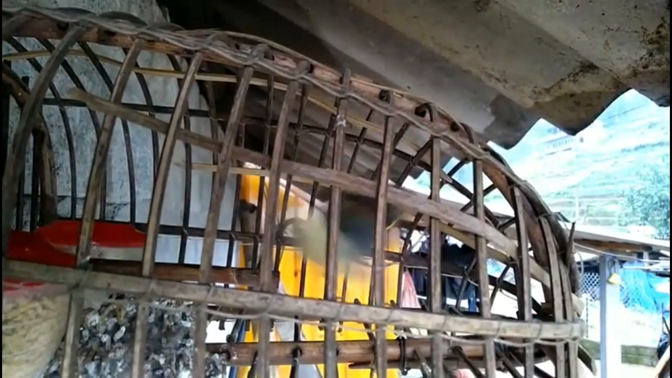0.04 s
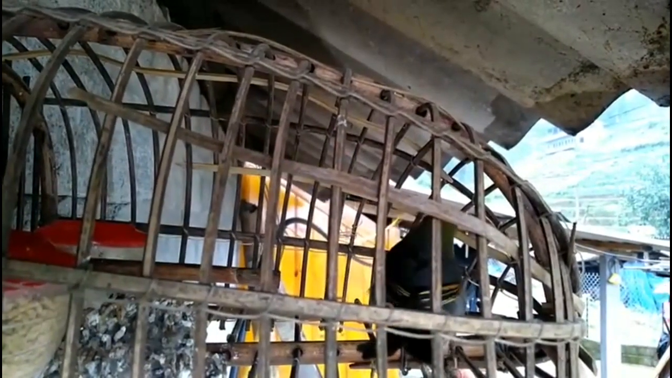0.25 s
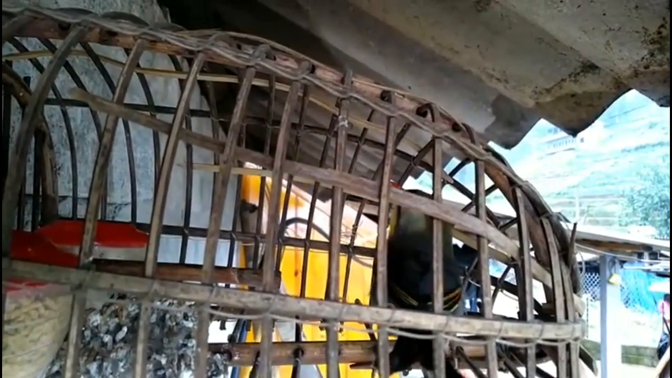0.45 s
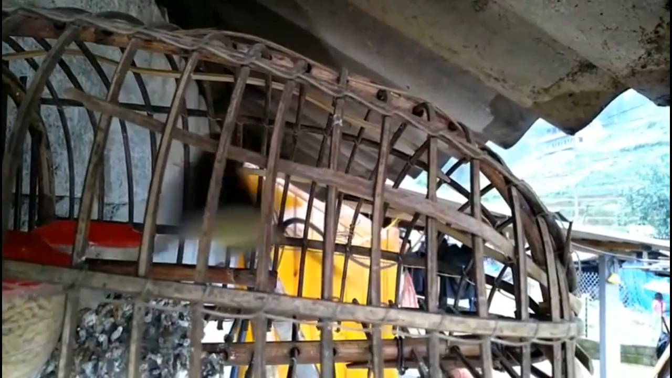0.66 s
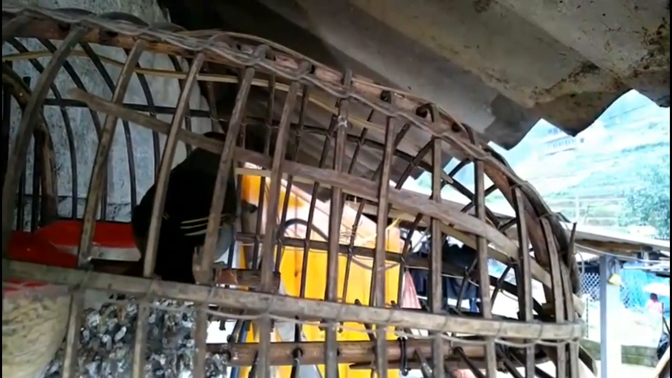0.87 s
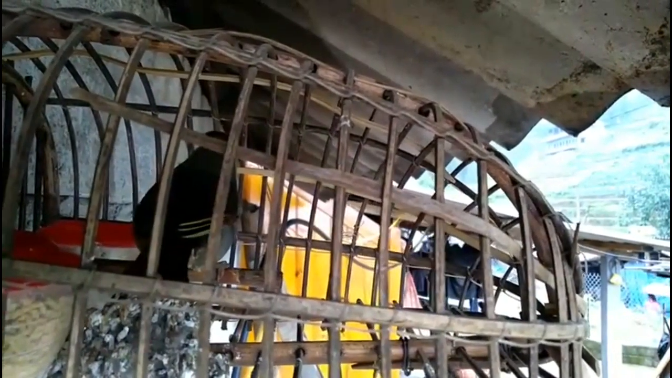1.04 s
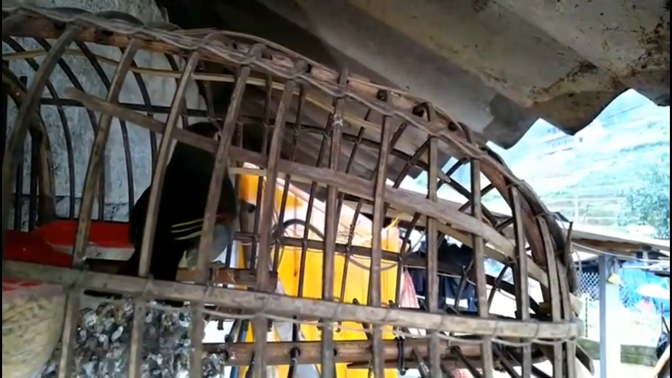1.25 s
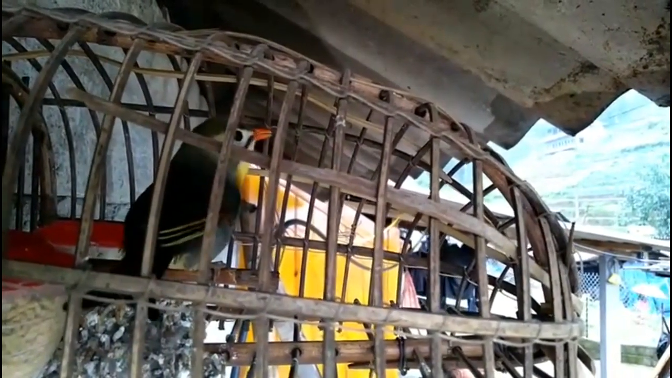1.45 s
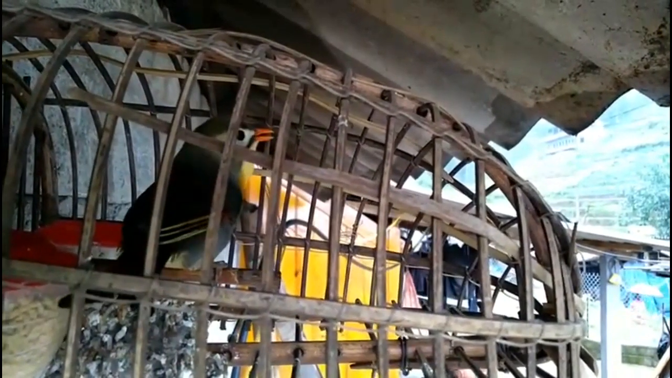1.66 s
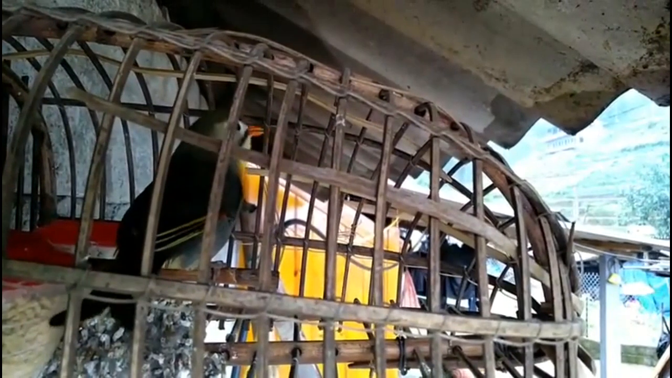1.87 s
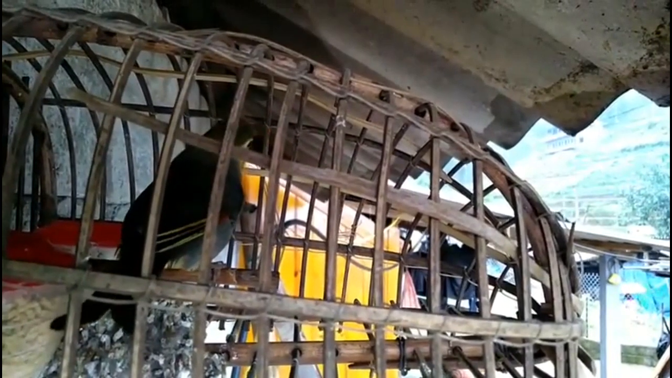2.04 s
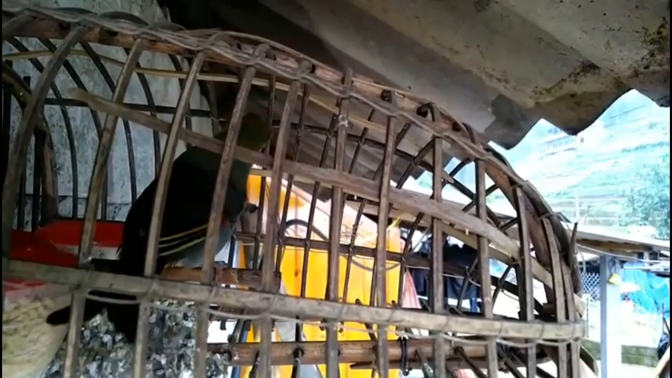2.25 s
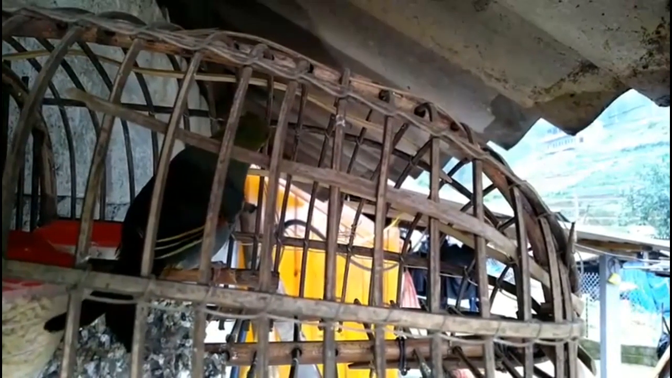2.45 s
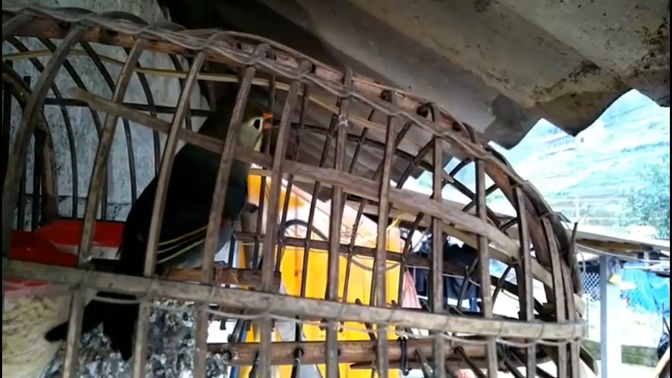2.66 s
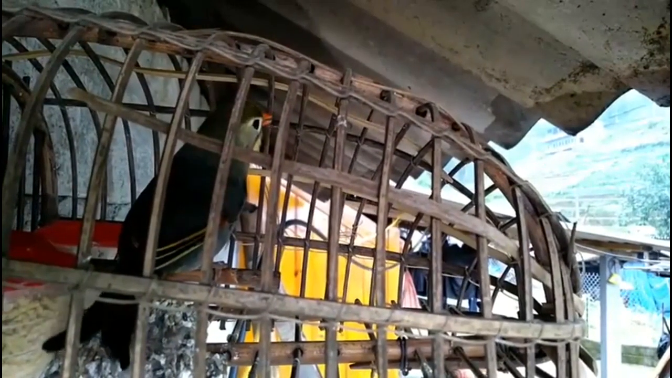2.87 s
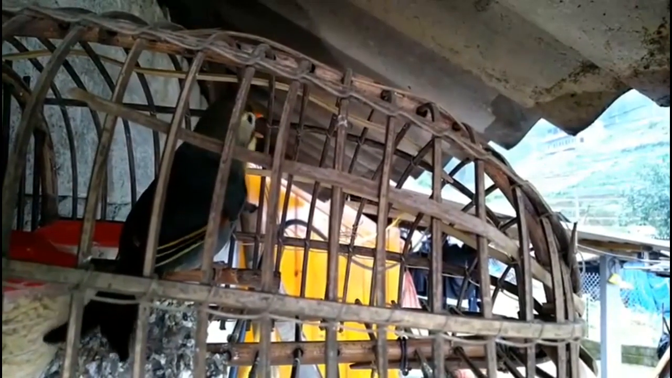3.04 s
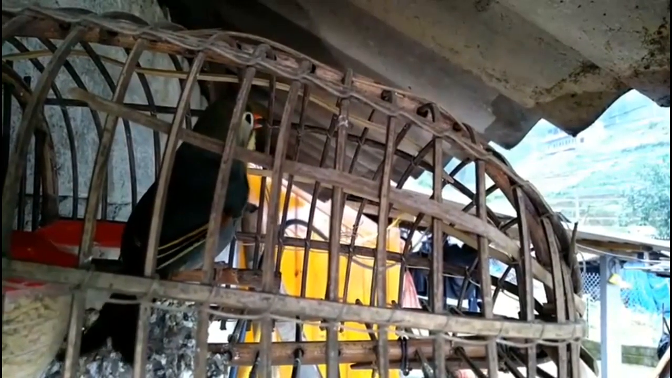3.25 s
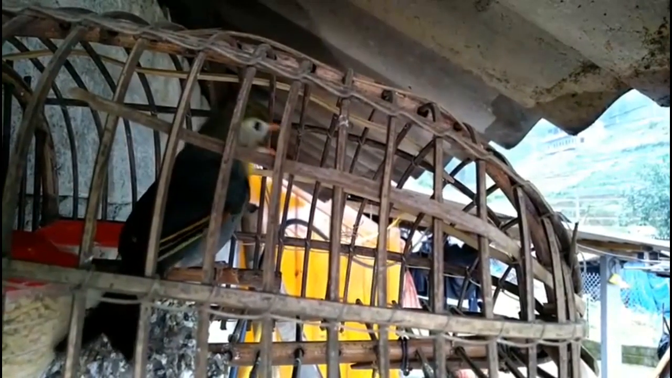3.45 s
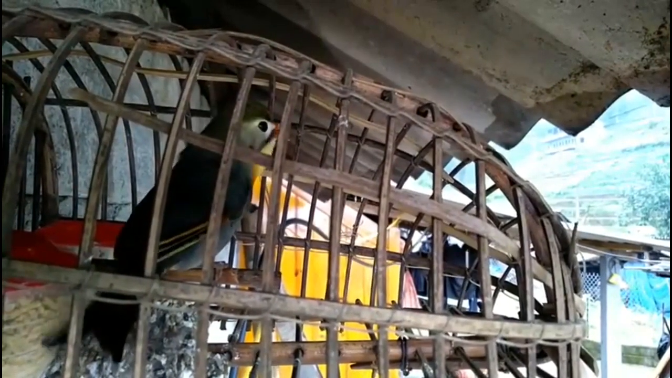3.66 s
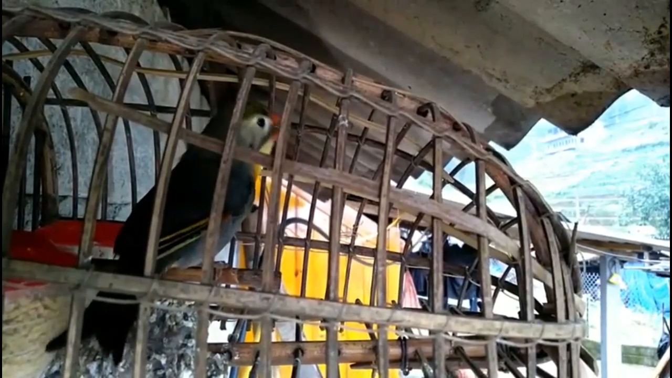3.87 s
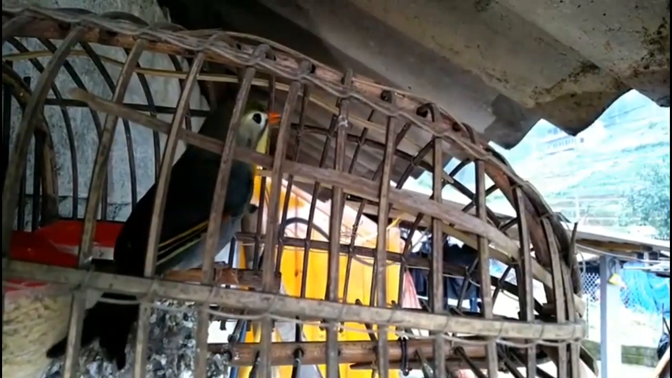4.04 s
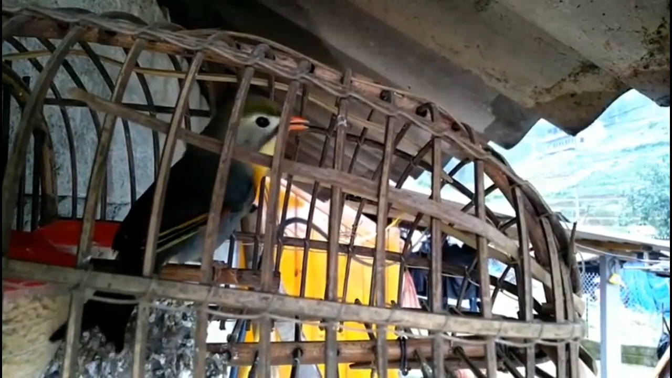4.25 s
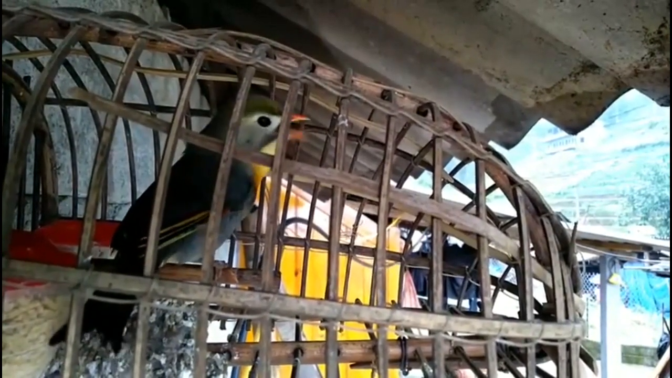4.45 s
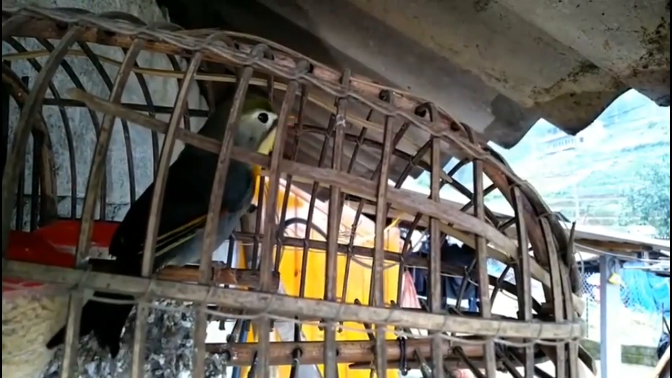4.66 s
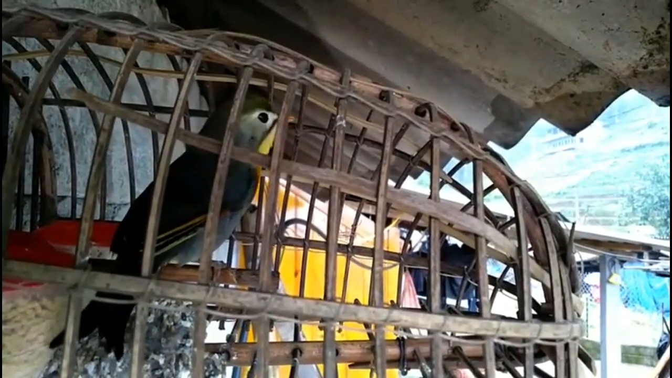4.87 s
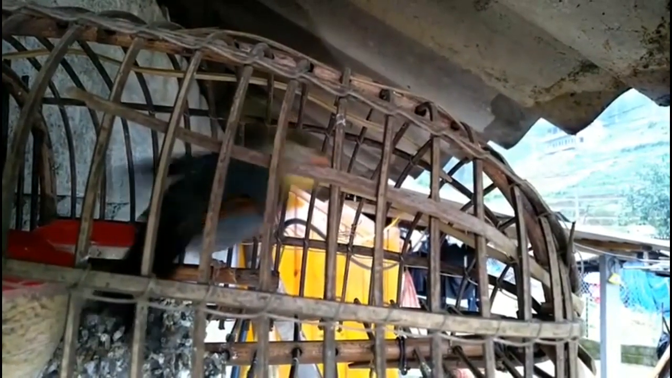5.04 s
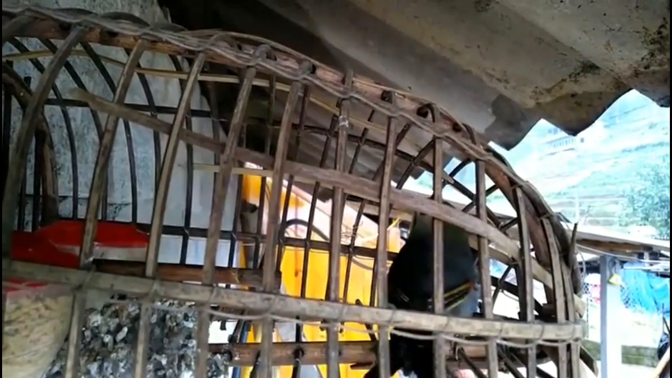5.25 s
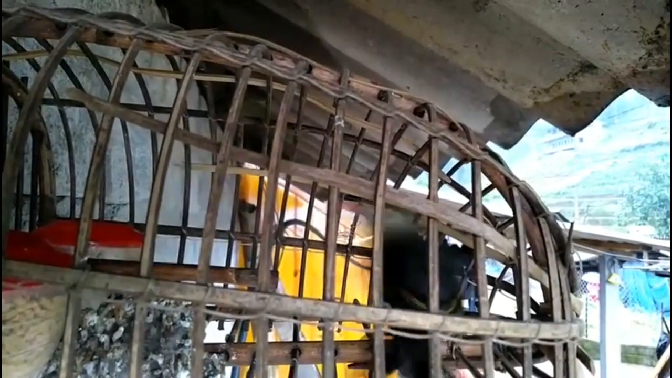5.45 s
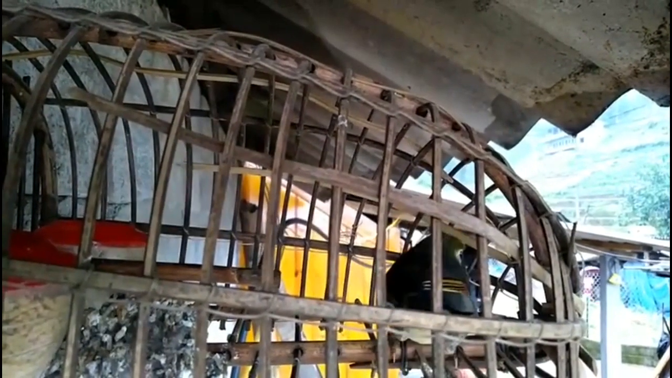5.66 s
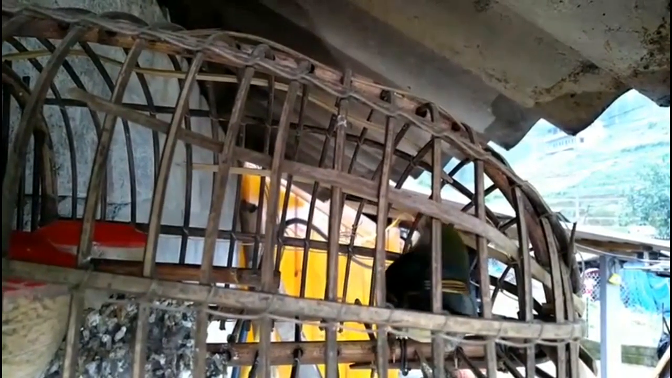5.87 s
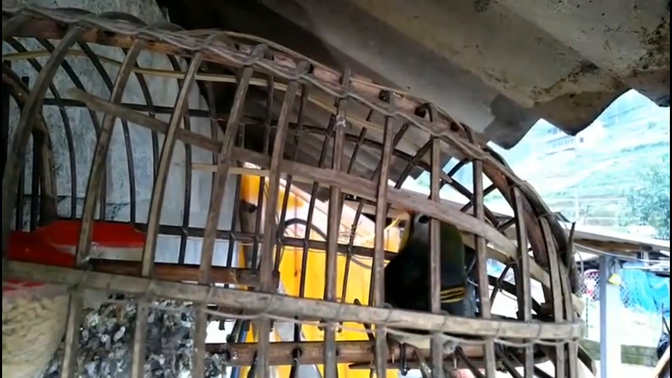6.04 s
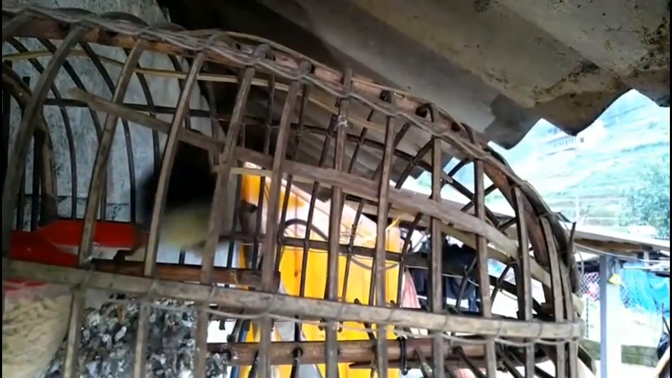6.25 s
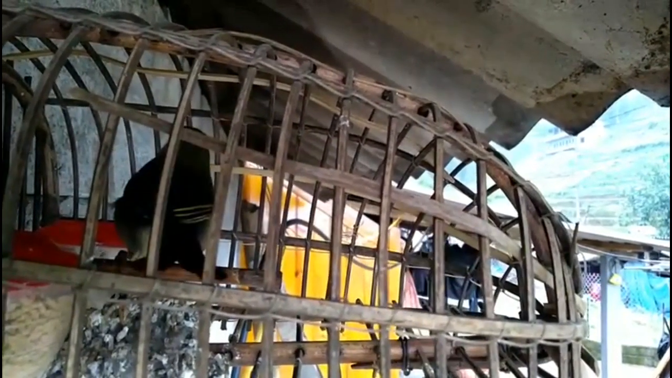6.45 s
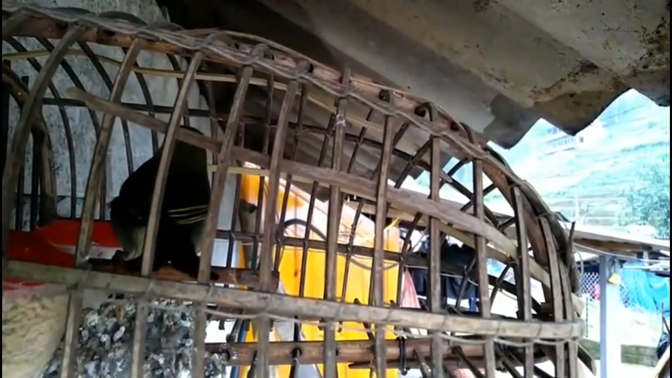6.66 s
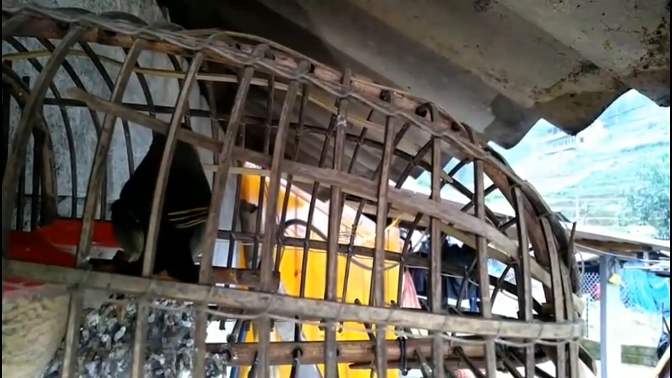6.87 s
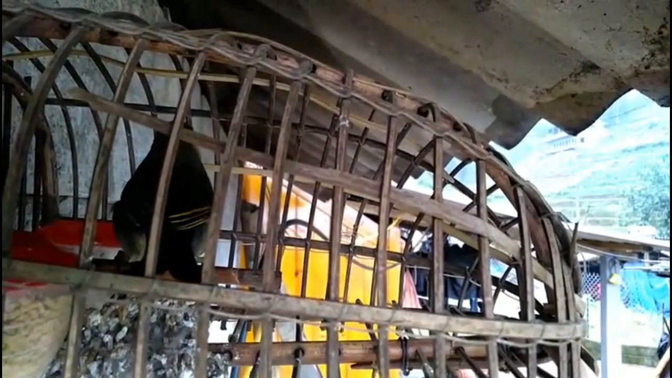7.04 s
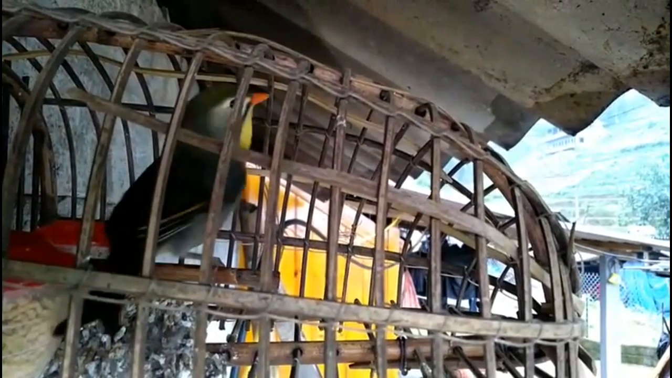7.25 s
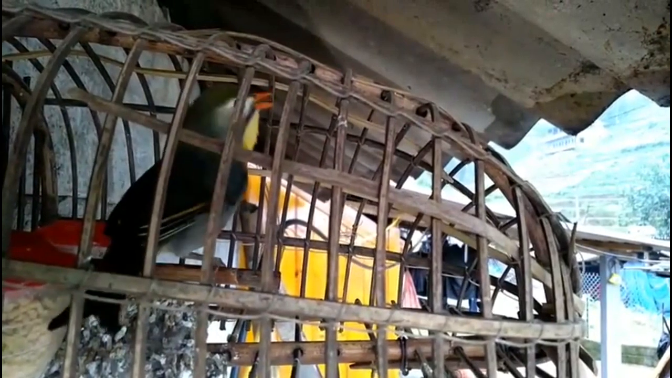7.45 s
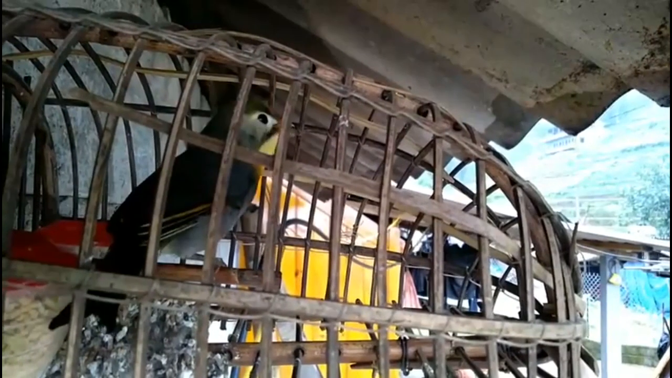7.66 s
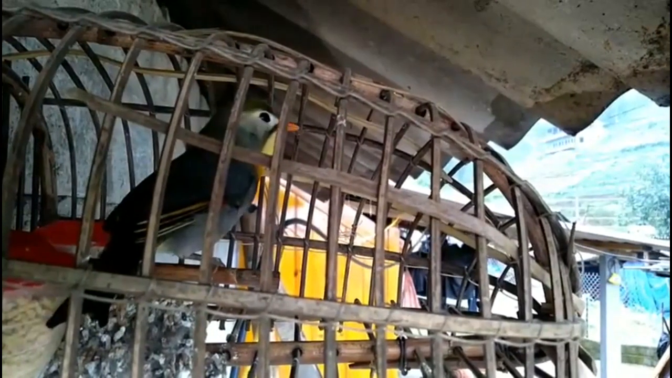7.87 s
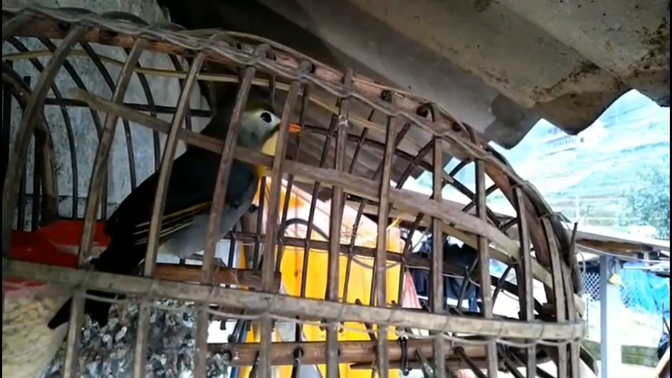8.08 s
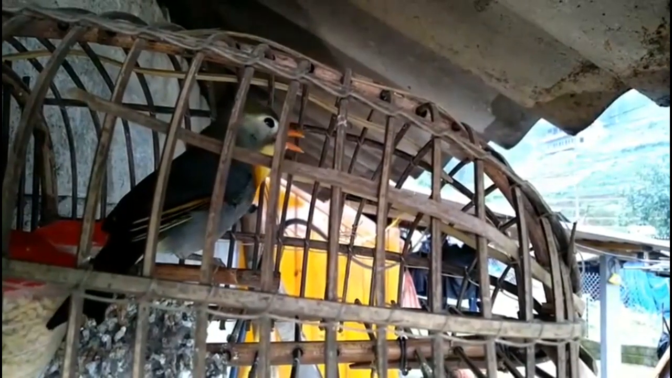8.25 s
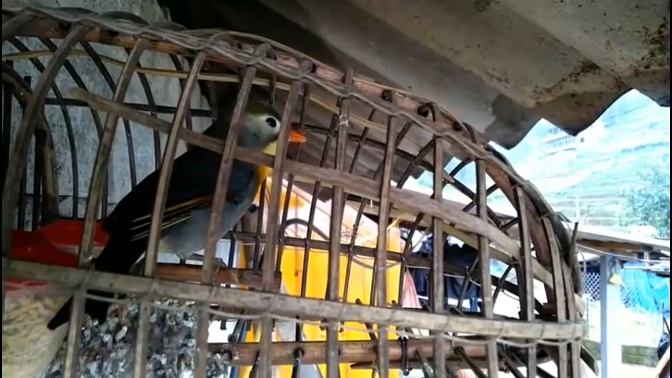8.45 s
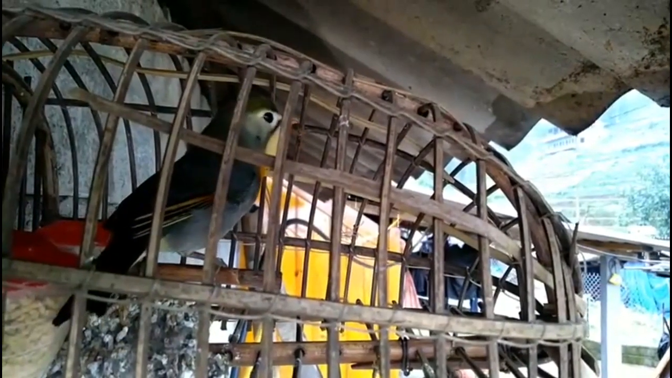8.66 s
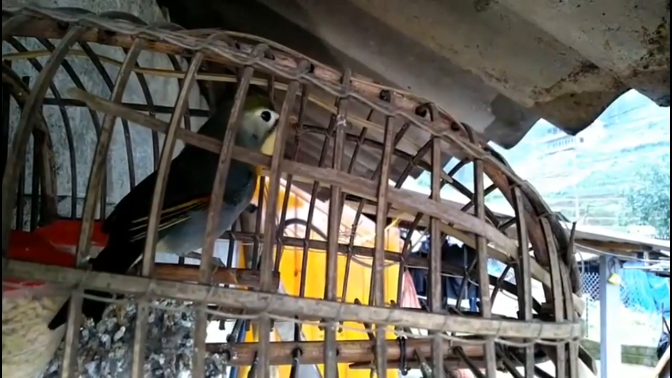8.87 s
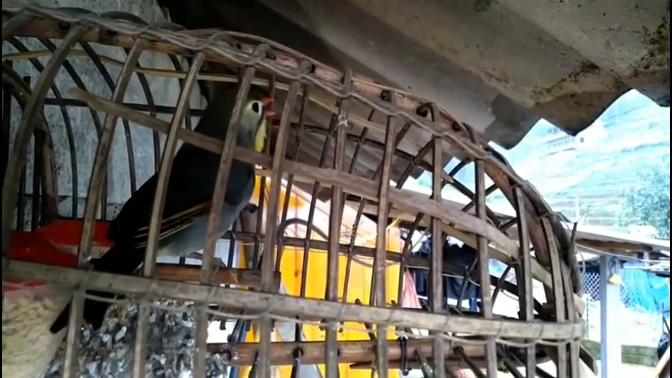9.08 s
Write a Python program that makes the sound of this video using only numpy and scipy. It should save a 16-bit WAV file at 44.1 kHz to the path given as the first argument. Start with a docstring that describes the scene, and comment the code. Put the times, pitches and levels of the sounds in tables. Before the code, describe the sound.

Outdoors beneath a low roof, a caged songbird is heard very close, with tight reflections. The sound almost vanishes for an instant near 0.1 s, then faint whistles start around 0.4 s with small perch ticks. From 0.8 s the notes strengthen into swift bending whistles around 1.5 to 3.7 kHz, with brief throbs, rasps and cracks, loudest from about 2.7 to 4.8 s. Soft low wind thumps touch the microphone from 3.2 to 4.6 s. Singing stops near 4.8 s, leaving hiss and faint scuffs; another near silence comes at 5.7 s. Weak notes return, with a tick near 5.95 s, and grow through 6.7 s into strong song from 7.2 s until about 9.1 s, where another soft thump falls. Throughout, gritty scuffs from feet or a broom recur about twice a second farther off, over uneven rumble and airy hiss.

```python
"""Under a low roof by a yard, a songbird in a bamboo cage whistles gliding notes close to the microphone:
sines bent along pitch tables, with weak overtones; near echoes make every glide beat.
Further off, feet or a broom scuff the yard about twice a second, as strokes of lumpy noise.
The perch ticks and gusts thump the microphone, each a dying noise puff through a resonance.
Patchy coloured noise makes the flickering hiss and rumble beneath; the sound nearly falls silent twice."""
import sys
import numpy as np
from scipy import signal
from scipy.fft import rfft, irfft, next_fast_len
from scipy.io import wavfile
from scipy.ndimage import uniform_filter1d, map_coordinates

SR = 44100
rng = np.random.default_rng(int(sys.argv[2]) if len(sys.argv) > 2 else 0)


def put_to_file(sound):
    """Save the sound as 16-bit audio at rate SR, in the file named by the first command-line argument."""
    columns = np.atleast_2d(sound).T  # one column per channel
    safe = np.clip(columns, -1, 1)
    whole_steps = np.round(safe * 32767)
    wavfile.write(sys.argv[1], SR, whole_steps.astype(np.int16))


N = 401751


def amp(db):
    """Decibels to an amplitude factor."""
    return 10 ** (np.asarray(db) / 20)


def unit(x):
    """x scaled to an rms of 1."""
    return x / np.sqrt(np.mean(x ** 2) + 1e-20)


def filtered(x, response):
    """x shaped by a response, a function of frequency in Hz."""
    m = next_fast_len(len(x) + 8192)
    return irfft(rfft(x, m) * response(np.fft.rfftfreq(m, 1 / SR)), m)[:len(x)]


def wobble(rate):
    """A smooth random curve through `rate` random knots a second."""
    knots = rng.standard_normal(int(N * rate / SR) + 4)
    return map_coordinates(knots, [np.arange(N) * rate / SR])


def band(centre_hz, width_hz):
    """The response of a causal resonance."""
    return lambda f: 1j * f * width_hz / (centre_hz ** 2 - f * f + 1j * f * width_hz)


def rush(spectrum, patchy_db, size):
    """Coloured noise of rms 1 with patches of random gain, each about size (bins, frames) across."""
    z = signal.stft(rng.standard_normal(N + 512), nperseg=512)[2]
    across_pitch = uniform_filter1d(rng.standard_normal(z.shape), size[0], axis=0)
    patches = unit(uniform_filter1d(across_pitch, size[1], axis=1))
    noise = signal.istft(z * amp(patchy_db * patches), nperseg=512)[1][:N]
    f, db = np.transpose(spectrum)
    return unit(filtered(noise, lambda hz: amp(np.interp(np.log(hz + 1), np.log(f + 1), db))))


def bursts(events, t60, colour):
    """For each (s, peak dB) contact, a noise puff dying 60 dB in t60 seconds, rung through a resonance."""
    out, t = np.zeros(N + SR), np.arange(SR // 4) / SR
    for s, db in events:
        puff = filtered(rng.standard_normal(len(t)) * amp(-60 * t / t60), colour)
        out[round(s * SR):][:len(t)] += amp(db) * puff / np.abs(puff).max()
    return out[:N]


def air(axis):
    """Gain per sample from one column: treble (1) swells and sinks, rumble (2) comes and goes."""
    # slow level changes of the background and all treble: time_s, treble_db, rumble_db
    air_levels = [(.12, -11, 7), (.45, -3, 2), (1.3, -7.5, 0.5), (2.6, 2, 0), (5.4, 4, -7.5), (5.6, -6, 4),
                  (6.399, -9, -0.5), (6.9, -6, 9), (8.101, -6, 0), (8.801, 3, -14.5)]
    columns = np.transpose(air_levels)
    return amp(np.interp(np.arange(N) / SR, columns[0], columns[axis]))


def low_rumble():
    """Patchy low noise whose level heaves with slow gusts."""
    # colour of the rumble: frequency_hz, relative_db_per_hz
    rumble_spectrum = [(25, -22), (150, -2), (500, -40)]
    gusts_db = 3.5 * wobble(5)
    return amp(-67.0 + gusts_db) * air(axis=2) * rush(rumble_spectrum, patchy_db=6, size=(3, 9))


def flickering_hiss():
    """Patchy noise with a quick flicker, swelling and sinking along with the bird's overtones."""
    # colour of the hiss: frequency_hz, relative_db_per_hz
    hiss_spectrum = [(300, -3), (3000, 4.5), (6500, -2.5), (10000, -11), (15500, -41)]
    flicker_db = 2.5 * wobble(60)
    return amp(-66 + flicker_db) * air(axis=1) * rush(hiss_spectrum, patchy_db=5, size=(3, 20))


def gust_thumps():
    """Gusts push the microphone: noise puffs through a double resonance at 110 Hz."""
    # gusts striking the microphone: start_s, peak_db (before the recorder)
    thump_events = [(3.226, -38.5), (3.607, -33), (4.037, -43.5), (4.248, -43.5), (4.614, -40.5),
                    (9.04, -38)]
    return bursts(thump_events, 0.53, lambda f: band(110, 150)(f) ** 2)


def perch_ticks():
    """Ticks of the perch: short puffs, brightest around 6.8 kHz."""
    # ticks of the perch: start_s, peak_db (before the recorder)
    tick_events = [(0.355, -38), (0.6058, -39.5), (0.6643, -42), (5.952, -46), (6.76, -40.5),
                   (7.4177, -41.5),  (8.0646, -43.5)]
    return bursts(tick_events, 0.12, lambda f: band(6800, 2000)(f) ** 2 + 0.12)


def yard_scuffs():
    """Grit dragged over the ground: each stroke swells fast and lingers, scratch first, low body after."""
    # strokes of the feet or broom: middle_s, level_db (before the recorder)
    strokes = [(0.466, -37), (0.889, -44.5), (1.296, -38), (1.684, -46.5), (2.098, -46.5), (2.499, -44.5),
               (2.928, -38.5), (3.37, -40.5), (3.801, -41.5), (4.679, -46), (5.26, -47), (5.35, -45),
               (6.078, -38.5), (6.497, -37), (6.896, -40), (7.349, -34.5), (7.796, -43), (8.312, -40.5),
               (8.759, -49)]
    # colour of the dragged grit: frequency_hz, relative_db_per_hz
    grit_spectrum = [(300, -20), (580, -3), (860, -6), (1250, -1), (1900, 4), (3000, -13.5), (7000, -27),
                     (15000, -62)]
    scratch_lead_s, rise_s, linger_s = .03, .05, .09
    t = np.arange(N) / SR

    def envelope(lead_s):
        """All strokes as lopsided bell curves, moved earlier by lead_s."""
        total = np.zeros(N)
        for middle_s, db in strokes:
            since = t - middle_s + lead_s
            total += amp(db) * np.exp(-(since / np.where(since < 0, rise_s, linger_s)) ** 2)
        return total

    grit = amp(3 * wobble(70)) * rush(grit_spectrum, patchy_db=6, size=(2, 22))
    low_body = filtered(grit, lambda hz: hz < 900)
    return envelope(scratch_lead_s) * (grit - low_body) + envelope(0) * low_body


def evenly_throbbing(t):
    """Sines that throb inside given stretches, and the gates that fade each stretch in and out."""
    # throbbing stretches of song: start_s, end_s, throbs_per_s
    trills = [(1.735, 1.79, 75), (1.185, 1.243, 125), (3.914, 4.016, 56.7), (8.36, 8.46, 62)]
    gate_sum, throb = np.zeros(N), np.zeros(N)
    for start, end, rate in trills:
        gate = np.clip(np.minimum(t - start, end - t) / .012, 0, 1)  # 12 ms fades
        gate_sum += gate
        throb += gate * np.sin(2 * np.pi * rate * (t - start))
    return gate_sum, throb


def bird():
    """A near-pure syrinx whistle; its two sides drift apart on fast glides and beat, and leaps crack."""
    # notes of straight glides: time_s at each corner, then as many pitch_hz, then level_db (before the
    # gains below), and on notes that clearly swell or die away, change_db from start to end
    song = [(0.385, 0.425, 0.448, 2310, 2780, 2000, -34, 12), (0.47, 0.541, 2750, 2540, -28),
            (0.79, 0.803, 2250, 2600, -28), (0.805, 0.837, 0.865, 2680, 2720, 1950, -19),
            (0.888, 0.938, 2700, 2500, -18), (1.071, 1.105, 1.14, 1850, 1550, 2250, -20),
            (1.189, 1.21, 1.235, 3218, 2752, 3550, -18), (1.268, 1.315, 1990, 1870, -16),
            (1.443, 1.467, 1.508, 1.565, 2700, 2500, 2870, 2724, -17, 7),
            (1.682, 1.707, 1.725, 2784, 2450, 1550, -17), (1.742, 1.775, 1.86, 1600, 2267, 2272, -14, -6),
            (1.84, 1.905, 3100, 3100, -32), (1.915, 1.94, 1.99, 2900, 2550, 2820, -12),
            (2.012, 2.027, 3050, 2620, -14), (2.2, 2.243, 2.257, 2.285, 2450, 2500, 2200, 3500, -25, 12),
            (2.3, 2.322, 2.338, 2.372, 2.428, 2450, 2150, 1600, 2477, 2350, -12),
            (2.57, 2.597, 2.612, 2.654, 2050, 2600, 2250, 1710, -15),
            (2.681, 2.686, 2.72, 2.77, 3450, 2805, 3170, 2838, -9, -6),
            (2.839, 2.865, 2.915, 2550, 2480, 1600, -16), (2.93, 2.966, 3.03, 1858, 2304, 2354, -12),
            (3.112, 3.128, 2750, 2800, -20), (3.128, 3.15, 3.231, 3.265, 2800, 2620, 2880, 2700, -9, -9),
            (3.39, 3.463, 3.503, 2237, 2430, 3340, -12, -6), (3.567, 3.655, 2820, 3500, -8, -9),
            (3.683, 3.72, 3050, 1700, -7), (3.753, 3.819, 2850, 2480, -12, -12),
            (3.922, 4.005, 4.022, 4.043, 2312, 1806, 2093, 3034, -12), (4.046, 4.14, 2800, 2560, -11, -12),
            (4.21, 4.238, 1600, 2450, -23), (4.24, 4.287, 4.325, 2550, 3100, 3120, -8, -13),
            (4.349, 4.41, 2612, 2232, -18),
            (4.521, 4.543, 4.563, 4.582, 4.65, 2606, 2462, 1600, 2288, 2940, -11),
            (4.692, 4.809, 2760, 2400, -8, -15), (5.729, 5.77, 3230, 3100, -41),
            (5.864, 5.95, 2920, 2500, -44), (5.99, 6.015, 6.055, 6.075, 2200, 2750, 2800, 2010, -30, 12),
            (6.09, 6.103, 6.19, 3115, 2773, 2500, -23, -10), (6.28, 6.37, 2200, 2450, -38),
            (6.41, 6.455, 6.475, 6.529, 1900, 2380, 2000, 1850, -22), (6.575, 6.64, 2100, 2000, -43),
            (6.676, 6.705, 6.755, 1950, 2500, 2910, -18.5),
            (6.798, 6.846, 6.925, 3344, 2543, 2516, -19, 10), (7.075, 7.105, 7.145, 1790, 2608, 2900, -18),
            (7.18, 7.21, 7.295, 3000, 2220, 2360, -13), (7.44, 7.487, 7.52, 2700, 2550, 2150, -32, 6),
            (7.545, 7.568, 2850, 3100, -27), (7.571, 7.607, 7.685, 2848, 2500, 2498, -8, -13),
            (7.79, 7.812, 7.848, 2740, 2850, 3750, -16), (7.913, 7.972, 8.03, 1463, 2372, 1667, -16.5),
            (8.082, 8.125, 8.192, 8.22, 2600, 2170, 2650, 1850, -13, -6), (8.34, 8.364, 3500, 3000, -25),
            (8.366, 8.49, 2830, 2660, -11, -8), (8.628, 8.662, 8.77, 1861, 2597, 2460, -19.5),
            (8.796, 8.827, 8.92, 2715, 1920, 2046, -14),
            (8.993, 9.003, 9.024, 9.042, 9.109, 2900, 2300, 1880, 2708, 3330, -8, -8)]
    # weak overtones: multiple_of_pitch, level_db below the whistle before flicker and air
    overtones = [(2, -45), (3, -59), (4, -65), (5, -59), (6, -66)]
    # how well the throat lets each pitch out: pitch_hz, gain_db
    throat = [(1500, -8.5), (2200, -1), (3200, 0), (3800, -9)]
    attack_s, attack_db = .012, -8  # a note swells from this far down
    release_s, release_db = .03, -5.5  # and sinks this far before it stops
    fade_db_per_s, edge_db_per_s = 27.5, 3502.5  # slow loss of breath; fall outside the note
    crack_hz_per_s, crack_spread, crack_db = 28000, .065, -5  # glide speed, pitch scatter share, loss
    rasp_hz_per_s = 19000  # glide speed that beats fully
    faint_db = -31  # softer notes never steady: they waver like a crack
    trill_depth, trill_bend = .85, .05  # a throb's shares of size and of pitch
    clean_s = .05  # a note starts pure; beats and cracks take this long to set in
    flicker_db = 5  # the overtones come and go

    t, out = np.arange(N) / SR, np.zeros(N)
    quaver, flutter, scatter = wobble(150), wobble(120), wobble(500)
    bright = air(axis=1)
    flicker = [amp(flicker_db * wobble(30)) for _ in overtones]
    trill, throb = evenly_throbbing(t)
    beat_hz = 55 * amp(3 * wobble(25))
    beat = np.cos(2 * np.pi * np.cumsum(beat_hz) / SR)
    for note in song:
        count = (len(note) - 1) // 2
        times, hz, (db, *swell_db) = note[:count], note[count:2 * count], note[2 * count:]
        start, end = times[0], times[-1]
        span = slice(int((start - .01) * SR), int((end + 0.043) * SR))
        since, left = t[span] - start, end - t[span]
        pitch = uniform_filter1d(np.interp(t[span], times, hz), size=400)
        settled = np.clip(since / clean_s, 0, 1)

        glide = np.abs(np.gradient(pitch)) * SR  # Hz a second
        crack = settled * np.clip(uniform_filter1d(glide, size=600) / crack_hz_per_s, 0, 1) ** 2
        unsteady = np.maximum(crack, .5 * (db < faint_db))
        # this average looks back, so the beats outlast the glide a little
        recent_glide = uniform_filter1d(glide, size=1000, origin=300, mode="constant")
        rasp = np.clip(recent_glide / rasp_hz_per_s, 0, 1) ** 1.5
        rasp = rasp * (1 - trill[span]) * settled  # even throbs replace the beats

        # pitch deviations as shares of the pitch
        tremble = (0.005 + .025 * rasp) * quaver[span]
        sag = 2 * rasp * (1 - np.abs(beat[span])) ** 2  # between the beats
        bend = trill_bend * (throb[span] - sag)
        smear = crack_spread * np.maximum(unsteady, .5 * rasp) * scatter[span]
        phase = 2 * np.pi * np.cumsum(pitch * (1 + tremble + bend + smear)) / SR

        trend_db = swell_db[0] * since / (end - start) if swell_db else -fade_db_per_s * since
        onset_db = attack_db * np.clip(1 - since / attack_s, 0, 1)
        ending_db = release_db * np.clip(1 - left / release_s, 0, 1)
        outside_db = edge_db_per_s * np.minimum(np.minimum(since, left), 0)
        shape_db = onset_db + ending_db + trend_db + outside_db
        throat_db = np.interp(pitch, *np.transpose(throat))
        flutter_db = (0.8 + 2 * rasp) * flutter[span]
        size = np.sqrt(2) * amp(db + shape_db + crack_db * crack + throat_db + flutter_db)
        size *= 1 + rasp * (np.sqrt(2) * beat[span] - 1)
        size *= 1 + trill_depth * throb[span]

        upper = np.zeros(len(phase))
        for (multiple, level), gain in zip(overtones, flicker):
            upper += amp(level) * gain[span] * np.sin(multiple * phase)
        out[span] += size * (np.sin(phase) + bright[span] * upper)
    return out


def shelter(x):
    """Close copies from roof and wall, then a short diffuse tail."""
    # echoes off roof and wall: delay_s, level_db
    echoes = [(.011, -11), (.035, -23)]
    out = x.copy()
    for s, db in echoes:
        out += amp(db) * np.pad(x, (int(s * SR), 0))[:N]
    t = np.arange(SR // 2) / SR
    tail = rng.standard_normal(len(t)) * amp(-60 * t / 0.26)  # dies 60 dB in 0.26 s
    return out + amp(-17.0) * signal.fftconvolve(x, tail / np.linalg.norm(tail))[:N]


def scene():
    """Background, contacts and yard around the sheltered bird, as one channel."""
    background = low_rumble() + flickering_hiss()
    contacts = gust_thumps() + perch_ticks()
    return (background + contacts + yard_scuffs() + shelter(bird()))[None]


def record(dry):
    """A gain ripple mirrors each note, the capsule peaks near 12 kHz and a fast limiter rounds peaks."""
    # stretches where the sound nearly falls silent: start_s, end_s
    dropouts = [(.03, .115), (5.655, 5.715)]
    ripple_hz, top_hz = 3915, 15800
    t = np.arange(N) / SR
    ripple = np.zeros(N)
    for multiple, db in [(1, -41.0), (2, -55.5)]:
        ripple += amp(db) * np.cos(2 * np.pi * multiple * ripple_hz * t)
    x = filtered(dry[0] * (1 + ripple), lambda f: 1 + 5 * band(12100, 1500)(f))
    level = uniform_filter1d(np.abs(x), size=64) * np.pi / 2  # the peak of a steady sine
    x = x / (0.5 + (level / .5) ** 4) ** 0.43  # lifts quiet sound slightly, holds loud sound down
    for start, end in dropouts:
        x = x * amp(-45 * np.clip(np.minimum(t - start, end - t) / 0.0045, 0, 1))
    return filtered(x, lambda hz: hz < top_hz)[None]


dry = scene()
out = record(dry)
put_to_file(out)
```